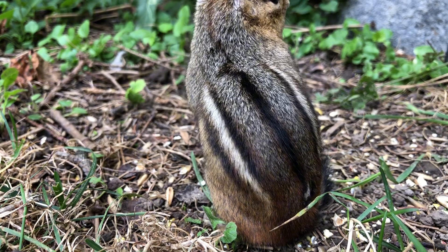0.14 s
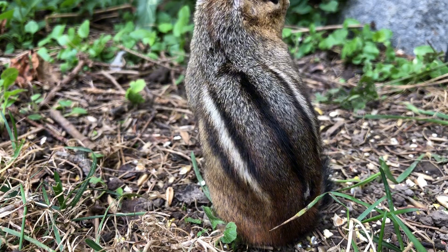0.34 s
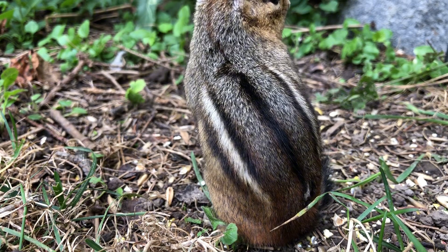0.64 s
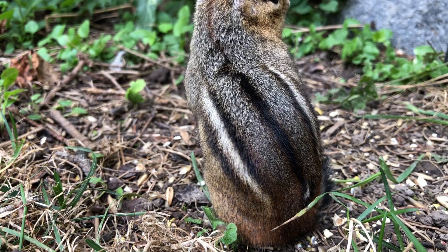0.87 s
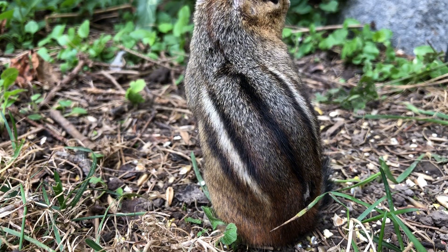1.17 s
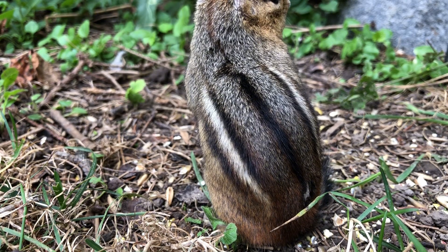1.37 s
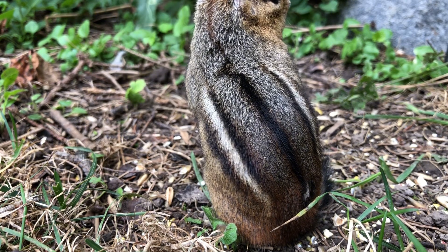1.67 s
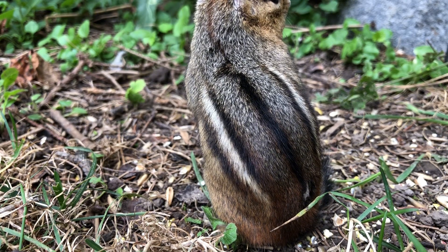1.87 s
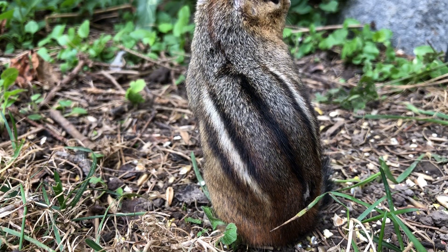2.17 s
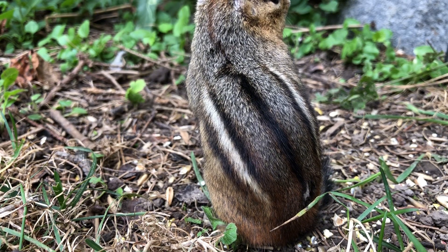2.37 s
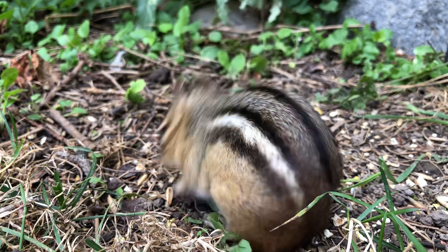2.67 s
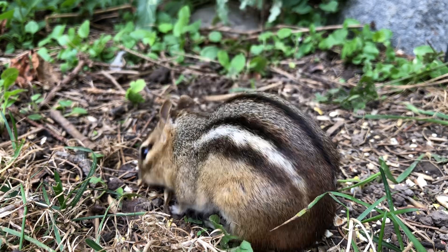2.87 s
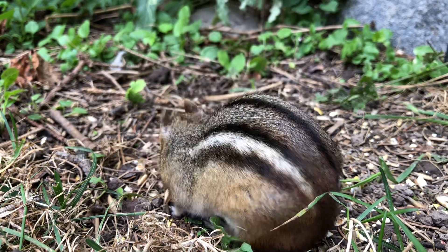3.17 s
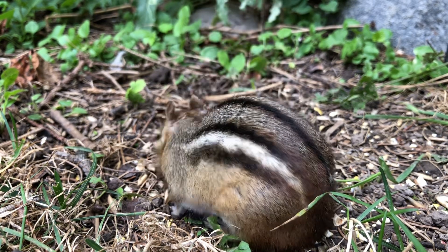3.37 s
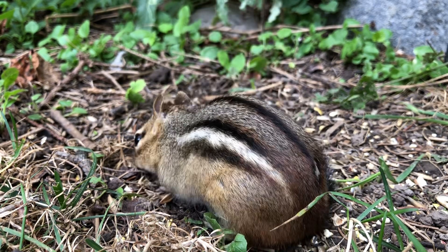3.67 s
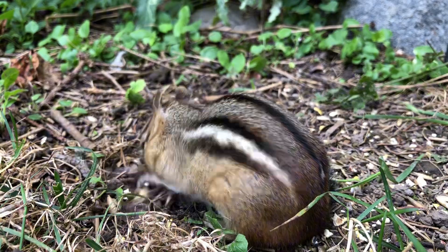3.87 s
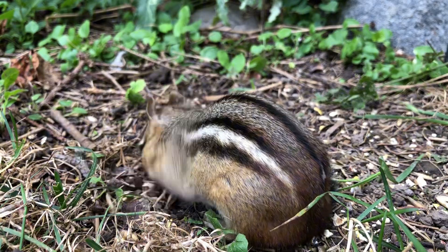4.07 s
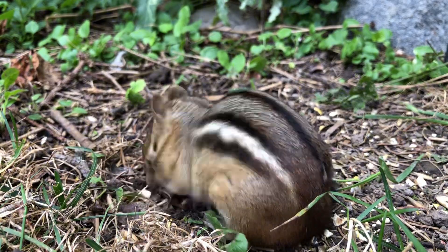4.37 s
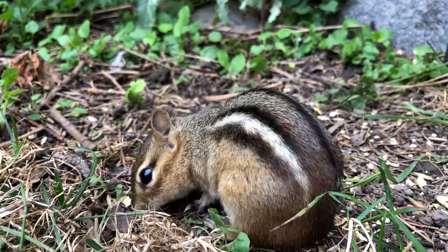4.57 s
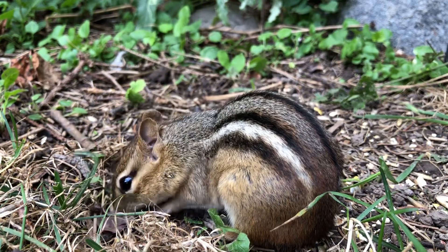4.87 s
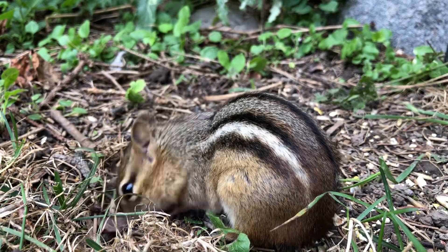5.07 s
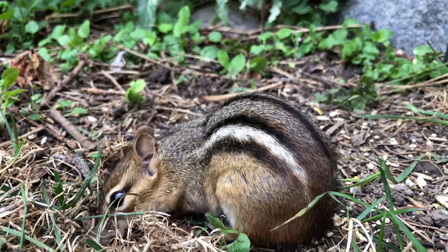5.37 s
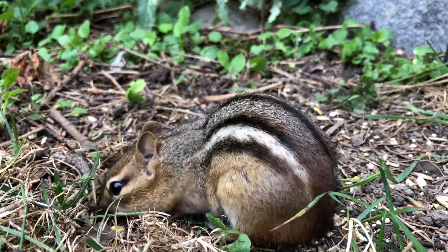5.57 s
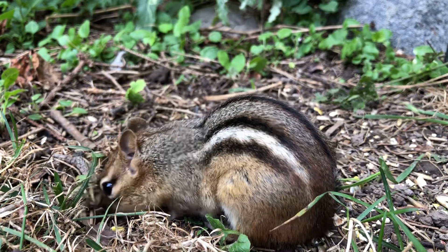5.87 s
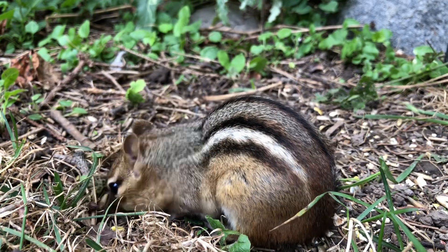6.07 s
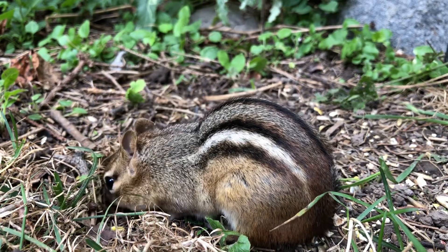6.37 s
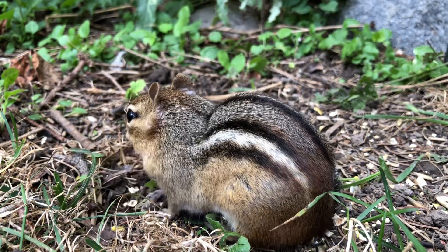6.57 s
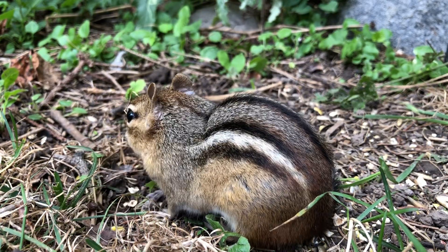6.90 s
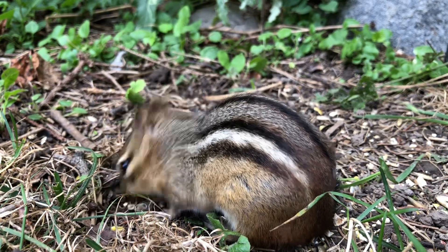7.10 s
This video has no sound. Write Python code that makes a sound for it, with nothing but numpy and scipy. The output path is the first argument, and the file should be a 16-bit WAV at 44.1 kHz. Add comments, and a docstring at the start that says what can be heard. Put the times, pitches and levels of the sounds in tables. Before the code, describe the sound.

In a quiet yard with a faint hiss and distant rumble, a chipmunk's piercing chip rings out, then another about two seconds later. Near the microphone, dry stalks crackle and snap lightly as the animal noses about. A seed shell clicks, a third chip follows at once, and small rustles carry on. The chips are much louder than everything else.

```python
"""Sharp, high chips from a chipmunk ring on in a yard. Each is a whistle of about 17 ms that
sweeps upward and is followed by echoes. Close by, paws and nose rustle in dry litter and
a seed shell cracks. Behind it all lie a low outdoor rumble, a soft hiss, a far wash of noise
and a faint pulsing insect."""
import sys
import numpy as np
from scipy import signal
from scipy.fft import rfft, irfft, next_fast_len
from scipy.io import wavfile
from scipy.ndimage import uniform_filter1d

SR = 44100
rng = np.random.default_rng(int(sys.argv[2]) if len(sys.argv) > 2 else 0)


def put_to_file(sound):
    """Save the sound as 16-bit audio at rate SR, in the file named by the first command-line argument."""
    columns = np.atleast_2d(sound).T  # one column per channel
    safe = np.clip(columns, -1, 1)
    whole_steps = np.round(safe * 32767)
    wavfile.write(sys.argv[1], SR, whole_steps.astype(np.int16))


N = 319284
TIME = np.arange(N) / SR


def amp(db):
    """Turn decibels into a number to multiply a sound by."""
    return 10 ** (np.asarray(db) / 20)


def unit(x):
    """Scale a sound to an average (rms) strength of 1."""
    return x / np.sqrt(np.mean(x ** 2) + 1e-20)


def along(points, hz):
    """Read between rows of (f/Hz, value), with octaves evenly spaced."""
    freqs, values = np.transpose(points)
    return np.interp(np.log(hz + 1), np.log(freqs + 1), values)


def filtered(x, response):
    """Turn each frequency of a sound up or down by response(hz)."""
    size = next_fast_len(len(x) + SR // 2)
    return irfft(rfft(x, size) * response(np.fft.rfftfreq(size, 1 / SR)), size)[:len(x)]


def coloured(x, spectrum):
    """Give a sound the tone colour in rows of (f/Hz, level/dB), at strength 1."""
    return unit(filtered(x, lambda hz: amp(along(spectrum, hz))))


def add(track, s, sound):
    """Mix a sound into the track, starting at s seconds."""
    start = round(s * SR)
    part = sound[max(-start, 0):N - start]
    track[max(start, 0):][:len(part)] += part


def air(hiss_db=-72.5):
    """A distant low rumble and an even hiss; a far, mid-pitched wash swells later on."""
    # tone colours of the three noises: f/Hz, level/dB
    rumble = [(15, -49.5), (25, -28.5), (38, -13), (58, -2.5), (70, 2.5), (82, -4.5), (98, 1), (125, -2),
              (200, -4), (320, -8.5), (500, -16), (1000, -29.5), (3000, -50)]
    hiss = [(100, -9), (500, 4.5), (1000, 1), (1800, -2.5), (2600, -5.5), (3400, -4.5), (5000, -7.5),
            (7000, -10), (10000, -15.5), (13000, -19.5), (15100, -17.5), (15800, -27)]
    wash = [(200, -19.5), (600, -2), (1100, 0), (2000, -1), (2700, -14.5), (5000, -27)]
    # slow drift in loudness: t/s, rumble level/dB, wash level/dB
    drift = [(0, -62, -88), (2, -64, -93), (3.8, -64, -84.5), (5.1, -63.2, -77.5), (7.24, -62.5, -81)]
    s, rumble_db, wash_db = np.transpose(drift)
    layers = [(np.interp(TIME, s, rumble_db), rumble),
              (hiss_db, hiss),
              (np.interp(TIME, s, wash_db), wash)]
    return sum(amp(db) * coloured(rng.standard_normal(N), spectrum) for db, spectrum in layers)


def insect(db=-92, hz=8920, width_hz=220, pulses_per_s=2.85, peak_s=7.3, uneven_db=2):
    """A far insect buzzes: a narrow band of noise in soft pulses of uneven strength."""
    buzz = unit(filtered(rng.standard_normal(N), lambda f: np.exp(-.5 * ((f - hz) / width_hz) ** 2)))
    strength = np.interp(TIME * pulses_per_s, np.arange(32), rng.standard_normal(32))
    pulses = np.cos(np.pi * pulses_per_s * (TIME - peak_s)) ** 2
    return amp(db + uneven_db * strength) * buzz * pulses


def small_snaps(start_s=3.35, end_s=6.2, count=16, db=-67.5, spread_db=4.5):
    """Thin stalks give way at random as the animal noses about: rows of (t/s, level/dB)."""
    times = start_s + (end_s - start_s) * (np.arange(count) + rng.random(count)) / count
    return list(zip(times, db + spread_db * rng.standard_normal(count)))


def litter(snap_gain_db=-6, snap_fade_s=.018, spread_db=-0.5, fibres_per_s=1000):
    """Paws and nose crush tiny dry fibres, scuff the soil and snap single stalks."""
    # shuffles: middle t/s, length/s, crackle level/dB, scuff level/dB
    shuffles = [(.895, .045, -72.5, -73), (2.647, .06, -81.5, -71.5), (3.854, 0.074, -72.5, -73.5),
                (4.146, 0.078, -81, -74.5), (4.44, 0.12, -77.5, -88), (4.717, .1, -80, -86),
                (4.817, 0.04, -72, -83), (5.32, 0.11, -84, -88), (5.56, .06, -81, -84),
                (5.86, 0.12, -82, -79), (6.13, .05, -78, -79), (7.076, .05, -87, -78),
                (7.224, 0.061, -78, -77.5)]
    # the loudest snapping stalks: t/s, level/dB
    loud_snaps = [(.9034, -54.5), (1.151, -58), (3.8242, -61), (3.924, -59), (4.4194, -57.5),
                  (4.6688, -59.5), (4.7371, -59.5), (4.8211, -50.5), (5.5716, -57.5), (5.8806, -62.5),
                  (7.2035, -64)]
    # tone colours of dry litter and of soil: f/Hz, level/dB
    dry_colour = [(1000, -16), (3000, -4), (6000, -5), (9000, -5), (13000, -2), (15500, -0.5)]
    soil_colour = [(200, -25), (900, 4), (2000, -1), (4000, -6.5), (7000, -10), (12000, -26)]
    crackle, scuff, snaps = np.zeros((3, N))  # how loud each is over time
    for s, length, crackle_db, scuff_db in shuffles:
        press = np.exp(-2 * ((TIME - s) / length) ** 2)
        crackle += amp(crackle_db) * press
        scuff += amp(scuff_db) * press
    t = np.arange(SR // 20) / SR
    for s, db in loud_snaps + small_snaps():
        add(snaps, s, amp(db + snap_gain_db - 60 * t / snap_fade_s))
    breaks = rng.random(N) < fibres_per_s / SR
    fibres = breaks * rng.standard_normal(N) * amp(spread_db * rng.standard_normal(N))
    return (crackle * coloured(fibres, dry_colour)
            + snaps * coloured(rng.standard_normal(N), dry_colour)
            + scuff * coloured(rng.standard_normal(N), soil_colour))


def seed(ring_s=0.0023, splinter_db=-20, splinter_s=.007):
    """A seed shell gives way: each crack is a very short ring and a spray of splinters."""
    # cracks of the shell: t/s, level/dB, ring f/Hz
    cracks = [(4.929, -41.5, 3360), (4.936, -41, 3320), (4.9797, -50, 3700), (5.309, -54.5, 3700),
              (5.43, -61, 4200)]
    track = np.zeros(N)
    t = np.arange(SR // 50) / SR
    for s, db, hz in cracks:
        ring = np.sin(2 * np.pi * hz * t) * amp(-60 * t / ring_s)
        splinters = amp(splinter_db - 60 * t / splinter_s) * rng.standard_normal(len(t))
        add(track, s, amp(db) * (ring + splinters))
    return track


def yard_echoes(build_s=.01):
    """The whole yard answers with a blur of echoes whose highest notes die first."""
    # how long the yard rings: f/Hz, time to fade by 60 dB/s
    ring_times = [(5000, .42), (6700, 0.41), (11000, .32), (14500, 0.27)]
    hz, t, noise = signal.stft(rng.standard_normal(SR // 2), SR, nperseg=256)
    fade = amp(-60 * t / along(ring_times, hz)[:, None])
    build = 1 - np.exp(-t / build_s)
    tail = signal.istft(noise * fade * build, SR, nperseg=256)[1][:SR // 2]
    return tail / np.linalg.norm(tail)


def near_echoes(fade_s, first_s=0.001, last_s=0.039):
    """Ground, stones and a wall throw back a tight bunch of early echoes."""
    t = np.arange(SR // 2) / SR
    echoes = rng.standard_normal(len(t)) * amp(-60 * t / fade_s) * (t > first_s) * (t < last_s)
    return echoes / np.linalg.norm(echoes)


def noise_burst(peak_s=.0028):
    """A tiny burst of high noise just as each chip begins."""
    # tone colour of the burst: f/Hz, level/dB
    colour = [(2500, -24), (3600, -18), (4900, -4), (8000, 5), (9500, -11.5), (11500, -3), (15500, -8)]
    age = np.arange(SR // 32) / SR / peak_s
    burst = (age * np.exp(1 - age)) ** 2
    return burst * coloured(rng.standard_normal(len(age)), colour)


def whistle(start_hz, top_hz, glide_s, scoop_hz, hold_s, octave_db, jitter=0.0077, third_db=-45):
    """The voice sweeps up with two overtones, trembling slightly as it swells, holds and fades."""
    scoop_s, glide_bend = 0.00066, 1.69
    attack_s, swell_s, swell_db = 0.0016, 0.0045, 7.5
    dip_s, dip_width_s, dip_db = .006, 0.0006, 2.5
    fade_db_per_s, release_s = 2501.5, .0075
    t = np.arange(SR // 32) / SR
    hz = top_hz - (top_hz - start_hz) * np.exp(-(t / glide_s) ** glide_bend)
    hz -= scoop_hz * np.exp(-t / scoop_s)  # slides into the sweep from below
    tremble = uniform_filter1d(rng.standard_normal(len(t)), size=30)
    tremble = unit(uniform_filter1d(tremble, size=20))
    phase = 2 * np.pi * np.cumsum(hz * (1 + jitter * tremble)) / SR
    tone = np.sin(phase) + amp(octave_db) * np.sin(2 * phase) + amp(third_db) * np.sin(3 * phase)
    db = -swell_db * np.maximum(1 - t / swell_s, 0)
    db -= fade_db_per_s * np.maximum(t - hold_s, 0)
    db -= dip_db * np.exp(-((t - dip_s) / dip_width_s) ** 2)  # the level dips briefly mid-sweep
    edge_s = np.minimum(t, hold_s + release_s - t)  # time to the nearer end of the call
    on_off = np.sin(np.pi / 2 * np.clip(edge_s / attack_s, 0, 1)) ** 2
    return on_off * amp(db) * tone


def chips(burst_lead_s=0.0017):
    """Each chip reaches us directly, then from nearby surfaces, then from the whole yard."""
    # the calls, the first already dying away at the start: t/s, level/dB, start f/Hz, top f/Hz,
    # glide/s, scoop/Hz, hold/s, octave/dB, burst/dB, near echo/dB, near echo fade/s, yard echo/dB
    calls = [(-.27, -16, 5300, 7200, .007, 301, .011, -11, -30, -6, .09, -15),
             (0.6111, -21, 5294, 7260, 0.0063, 200, .0098, -14, -29, -3, 0.085, -11),
             (2.4669, -23, 5335, 7090, 0.0063, 445.5, .015, -15.5, -30.5, 1.5, 0.1329, -11),
             (5.0183, -21, 6020, 7310, .0085, 1493, .0118, -10.5, -25, -2.5, .082, -11.5)]
    # tone colour of the chips, with narrow dips near 10.2 and 12.6 kHz: f/Hz, level/dB
    colour = [(3000, -29.5), (4000, -13), (4700, -0.5), (5400, 0), (7200, -1.5), (10150, -14.5), (10750, 3),
              (12150, 0.5), (12650, -5.5), (13200, -2.5), (13900, -0.5), (14400, -1), (15300, -6.5)]
    voice, bursts = np.zeros((2, N))
    for s, db, *whistle_shape, burst_db, near_db, near_fade_s, yard_db in calls:
        paths = amp(near_db) * near_echoes(near_fade_s) + amp(yard_db) * yard_echoes()
        paths[0] += 1  # the direct sound
        add(voice, s, amp(db) * signal.fftconvolve(whistle(*whistle_shape), paths))
        add(bursts, s - burst_lead_s, amp(db + burst_db) * noise_burst())
    return filtered(voice, lambda hz: amp(along(colour, hz))) + bursts


def scene():
    """The chipmunk and its surroundings, mixed into one channel."""
    return (chips() + seed() + litter() + insect() + air())[None]


def record(dry):
    """The recorder keeps nothing above its highest frequency."""
    top_hz = 15750
    return np.array([filtered(channel, lambda hz: hz < top_hz) for channel in dry])


dry = scene()
out = record(dry)
put_to_file(out)
```